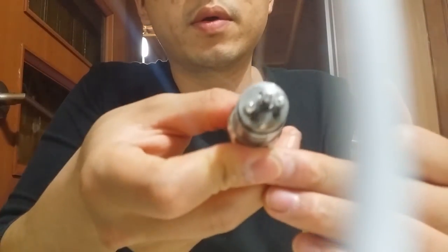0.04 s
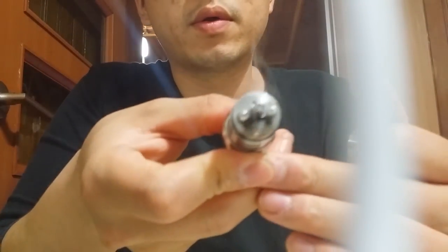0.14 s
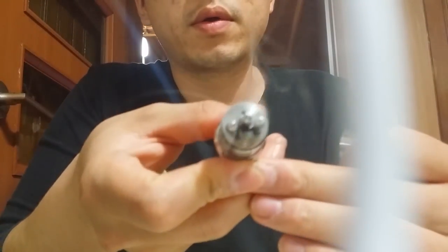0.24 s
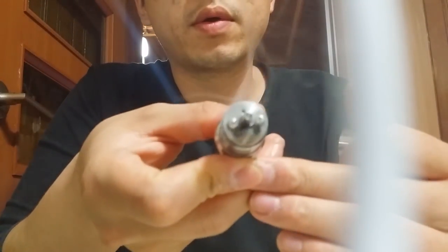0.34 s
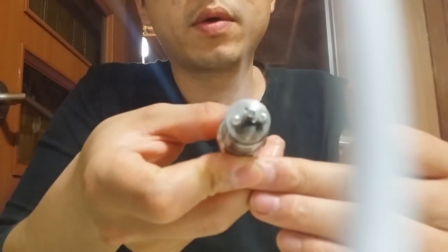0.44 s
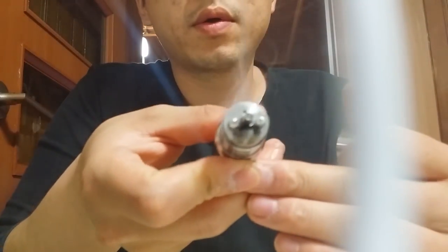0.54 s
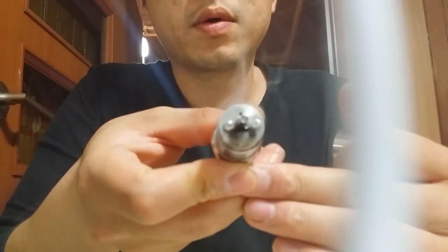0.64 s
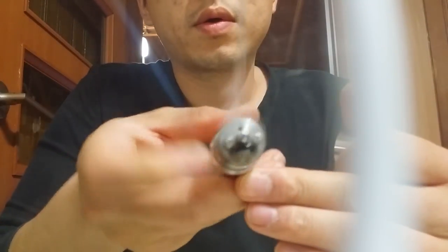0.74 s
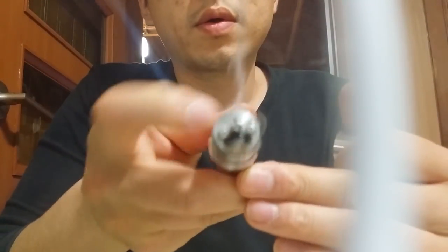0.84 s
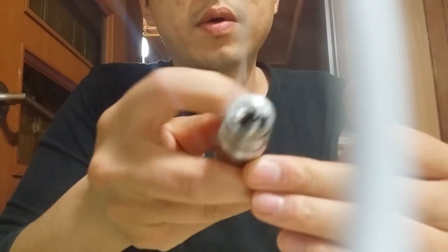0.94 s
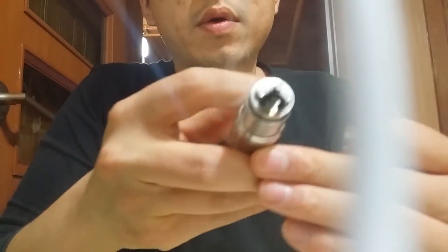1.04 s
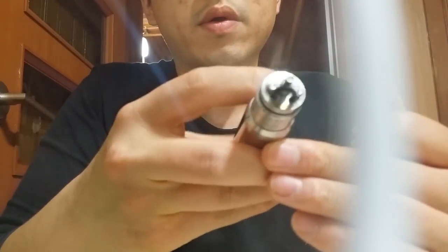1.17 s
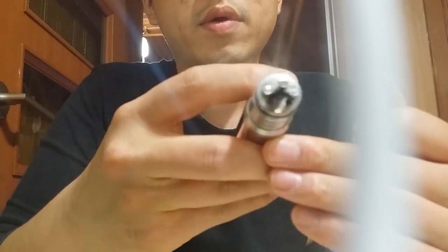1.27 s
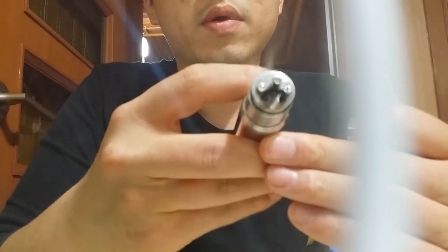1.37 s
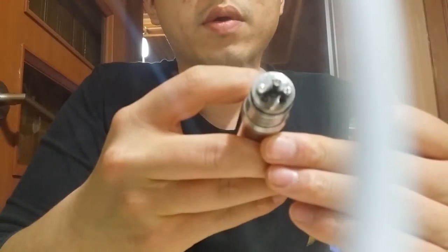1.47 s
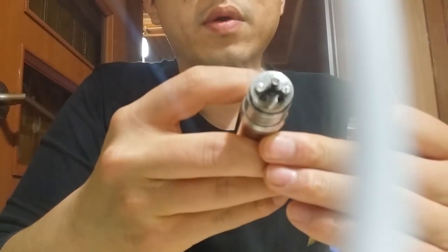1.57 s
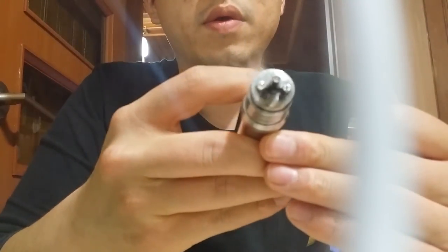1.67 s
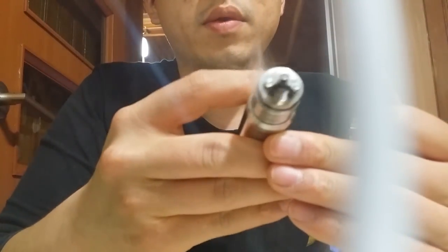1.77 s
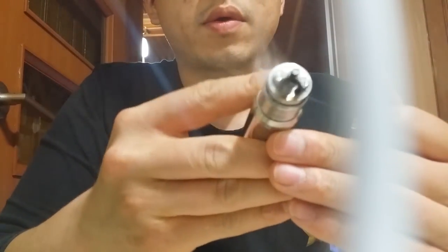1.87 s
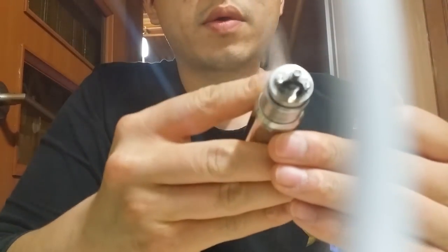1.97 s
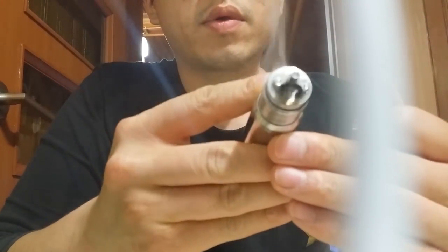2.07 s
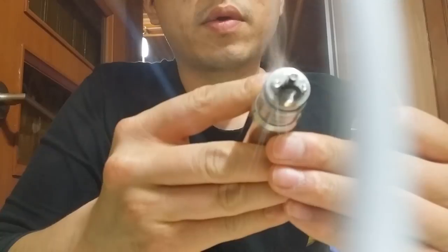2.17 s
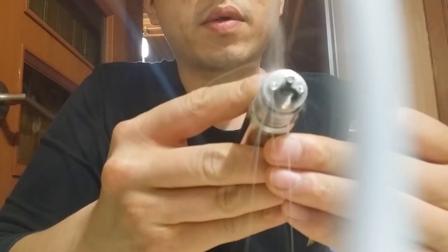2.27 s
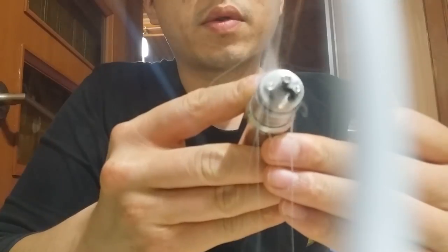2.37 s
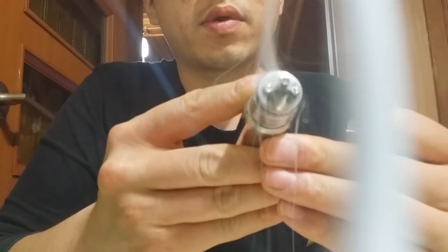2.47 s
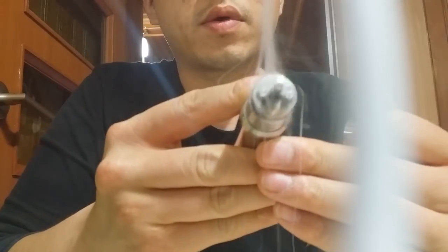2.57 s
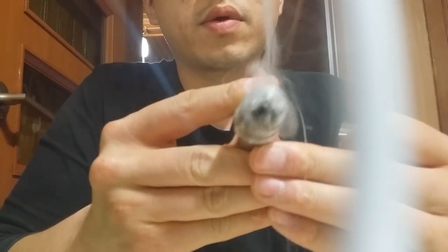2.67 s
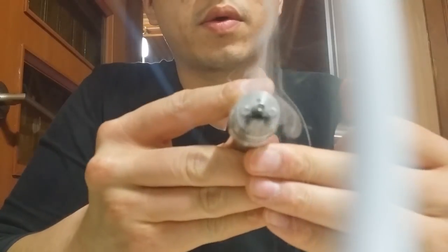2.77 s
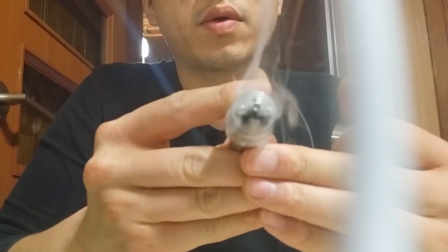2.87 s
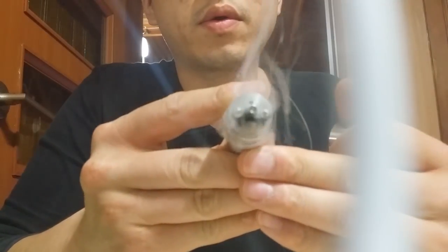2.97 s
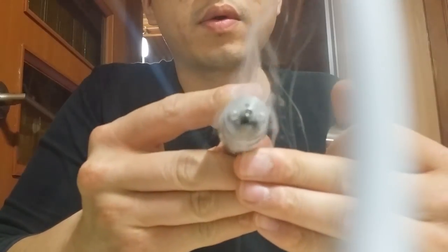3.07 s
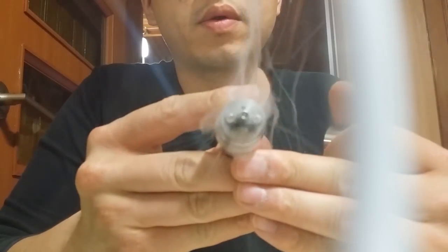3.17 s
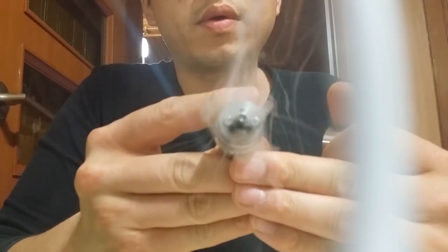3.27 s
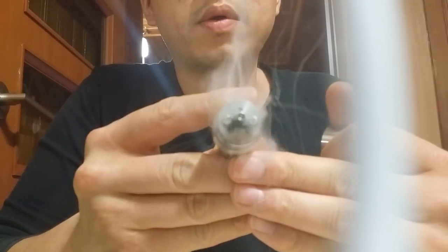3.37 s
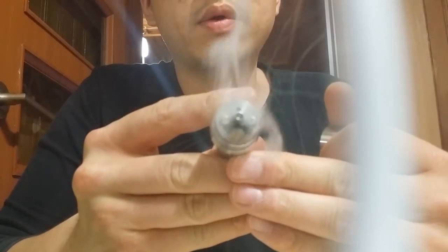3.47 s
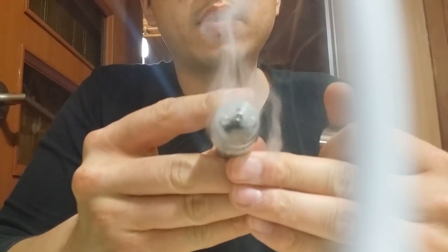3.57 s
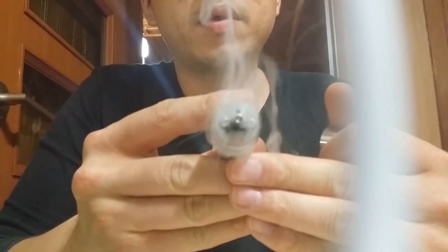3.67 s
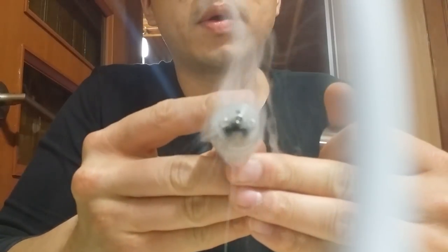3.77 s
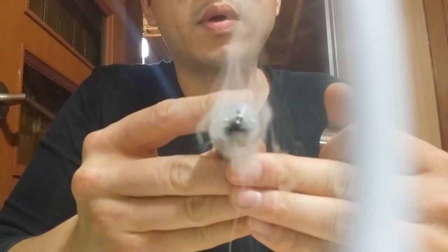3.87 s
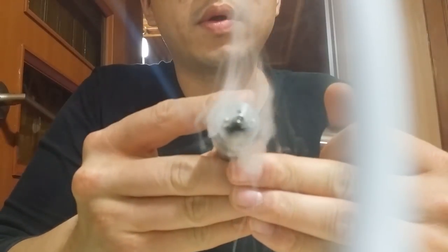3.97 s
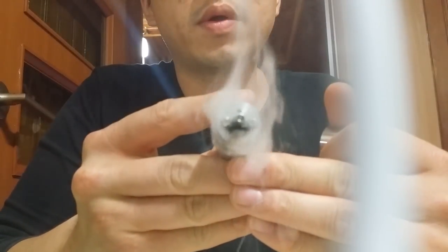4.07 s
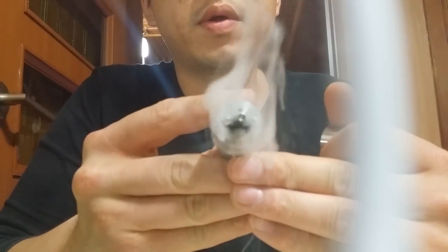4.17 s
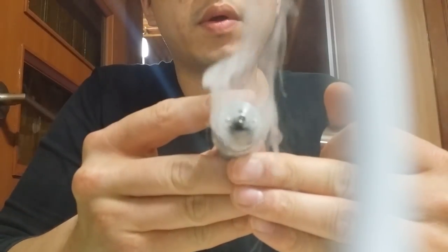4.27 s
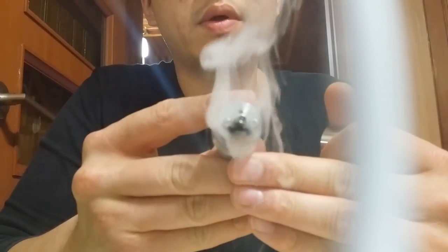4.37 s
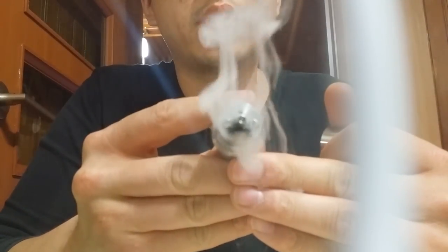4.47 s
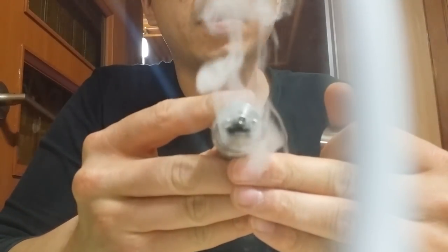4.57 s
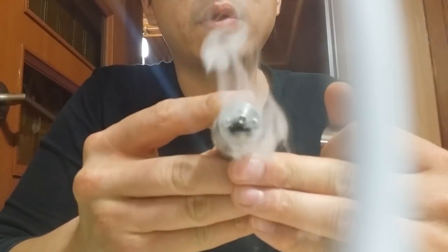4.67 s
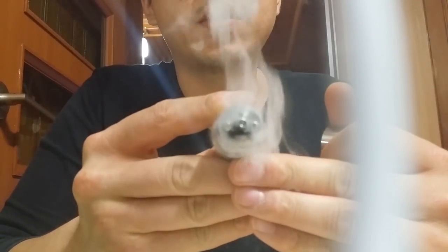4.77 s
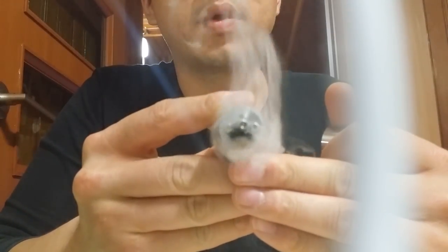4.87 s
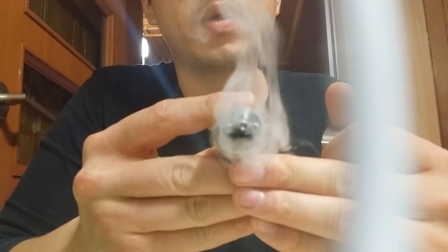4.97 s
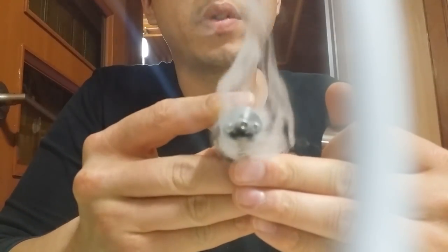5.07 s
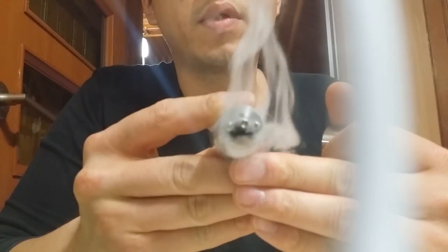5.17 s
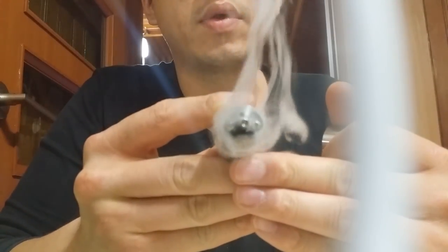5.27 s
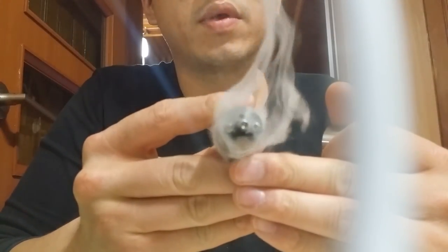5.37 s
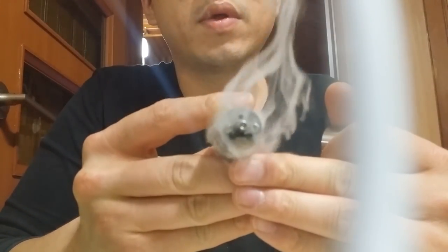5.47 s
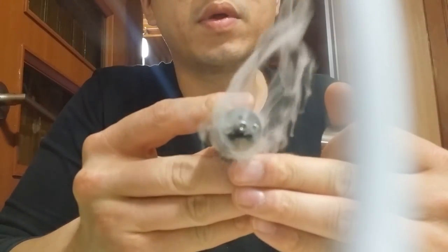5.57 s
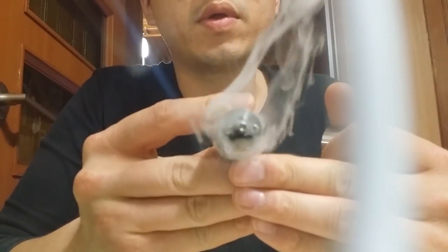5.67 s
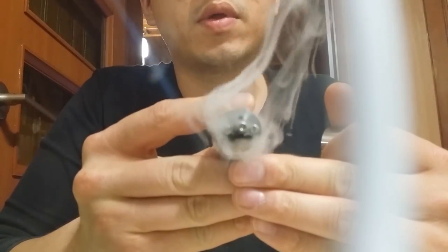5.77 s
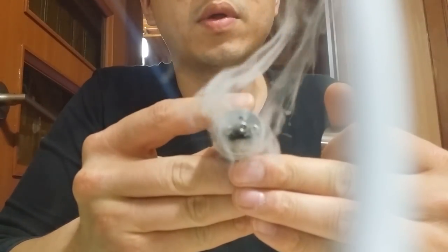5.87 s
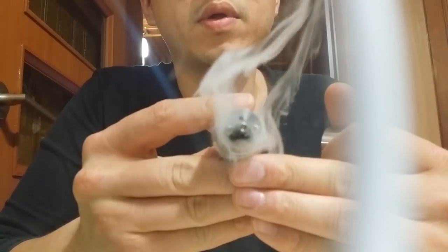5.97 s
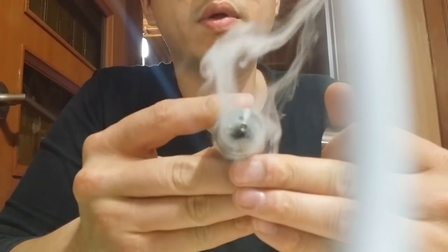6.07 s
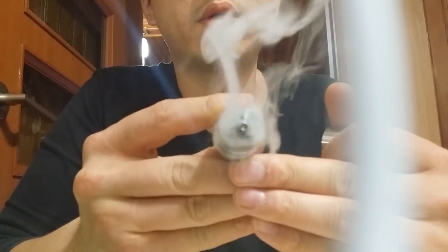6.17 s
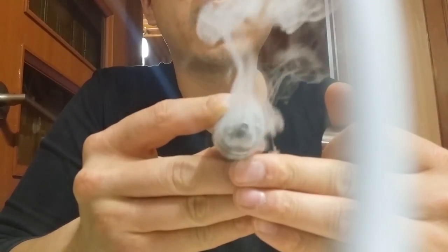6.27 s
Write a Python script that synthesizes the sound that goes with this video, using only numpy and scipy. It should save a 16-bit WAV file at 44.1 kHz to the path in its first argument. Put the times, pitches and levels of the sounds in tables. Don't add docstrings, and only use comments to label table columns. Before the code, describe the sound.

A small heating coil sizzles faintly, a switch clacks, then after a quiet gap it builds into loud, dense, crackling fizz that continues to the end.

```python
import sys
import numpy as np
from scipy import signal
from scipy.fft import irfft
from scipy.io import wavfile
from scipy.ndimage import uniform_filter1d

SR = 44100
rng = np.random.default_rng(int(sys.argv[2]) if len(sys.argv) > 2 else 0)


def to_wav(sig):
    pcm = np.clip(np.atleast_2d(sig), -1, 1) * 32767
    pcm = np.round(pcm).astype(np.int16)
    wavfile.write(sys.argv[1], SR, pcm.T)


def natural_amplitude(level_db):
    exponent = np.asarray(level_db, float) / 20
    return 10 ** exponent


N = 279594
T = np.arange(N) / SR

# time in seconds, fizz level in dB, share of coarse bubbles 0-1.
BOIL = [(0.0, -59.5, 0), (0.3, -53.5, 0.57), (0.51, -56.5, 0.7), (0.73, -55.5, 0.3), (0.83, -74, 0.1),
        (1.24, -76.5, 0), (1.62, -74, 0.04), (1.69, -61, 0.6), (2.2, -60, 0.34), (2.58, -53, 0),
        (2.91, -52.5, 0.1), (3.36, -49, 0.17), (3.78, -42, 0.45), (3.9, -47, 0.35), (4.15, -40.5, 0.4),
        (4.3, -41.5, 0.25), (5.21, -40.5, 0.29), (6.34, -41.5, 0.45)]


def evened(x):
    return x / np.sqrt(np.mean(x ** 2) + 1e-20)


def read(points, hz):
    f, value = np.transpose(points)
    return np.interp(np.log(hz + 1), np.log(f + 1), value)


def band(x, lo_hz, hi_hz):
    return signal.sosfilt(signal.butter(2, [lo_hz, hi_hz], "bandpass", fs=SR, output="sos"), x)


def boil_db():
    # time in seconds, lift in dB, fade time in seconds.
    flares = [(2.243, 4.5, 0.018), (2.95, 6, 0.088), (3.169, 5, 0.061), (3.32, 2.5, 0.022),
              (3.44, 3, 0.076)]
    s, db, _ = np.transpose(BOIL)
    lift_db = sum(peak_db * np.exp(-((T - at) / fade_s) ** 2) for at, peak_db, fade_s in flares)
    return np.interp(T, s, db) + lift_db


def bubbles(per_s, spread_db, most):
    size = natural_amplitude(spread_db * np.minimum(rng.exponential(1, N), most))
    train = evened(size * (rng.random(N) < per_s / SR))
    far = train * (rng.random(N) < .5)
    return np.array([train, train - far + np.roll(far, 1)])


def fizz():
    s, _, coarse = np.transpose(BOIL)
    coarse = np.interp(T, s, np.clip(coarse, 0, 1))
    fizz_db = boil_db()
    body_db = -11 - 0.0469 * (fizz_db + 52.5)
    flutter = natural_amplitude(0.56 * evened(uniform_filter1d(rng.standard_normal(N), 700)))
    fine_bursts = bubbles(6000, 2.54, 4.7) * flutter
    coarse_bursts = bubbles(240, 6.8, 1.85)
    drive = np.sqrt(1 - coarse) * fine_bursts + np.sqrt(coarse) * coarse_bursts
    body = natural_amplitude(body_db + 17.5) * band(drive, 167, 864)
    return natural_amplitude(fizz_db + 3.0) * (band(drive, 1570, 22000) + body)


def spit_rows():
    # time in seconds, peak in dB, middle band in dB re peak, low band in dB re peak.
    large = [(0.451, -16, -43, -28), (1.4532, -40.5, -10, -22), (2.1365, -23, -16, -28),
             (2.2452, -13, -8.5, -19), (2.2572, -19, -34, -44), (2.4818, -17.5, -12, -25),
             (2.5371, -27, -5.5, -21), (2.5455, -17.5, -20, -29), (2.8172, -16, -15, -28),
             (2.8256, -29, -2, -8), (3.0797, -26.5, -28, -6.5), (3.1745, -14, -7.5, -13),
             (3.2786, -18.5, -6.5, -15), (3.3253, -7, -13.5, -21.5), (3.5601, -16, -6.5, -14),
             (3.595, -16, -10, -14), (3.732, -14, -9.5, -17.5), (3.806, -10, -12, -15.5),
             (3.8263, -11.5, -10.5, -27), (3.8559, -2, -29, -38), (3.8692, -8, -23, -18.5),
             (3.8874, -5, -26, -31), (3.9442, -4, -16.5, -23.5), (3.9899, -2.5, -31, -30.5),
             (4.1665, -7.5, -12, -21), (4.4389, -6, -26, -26), (5.1187, -12, -16, -22),
             (5.2373, -13.5, -10.5, -16), (5.3017, -13, -30, -26), (6.2027, -15.5, -7, -14)]
    # time in seconds, peak in dB.
    ticks = [(0.1463, -24), (0.202, -23), (0.2276, -22.5), (0.2391, -25.5), (0.2545, -24), (0.268, -28),
             (0.2842, -21.5), (0.3122, -24.5), (0.3602, -26), (0.378, -22.5), (0.4124, -20.5),
             (0.4297, -22), (0.5536, -25), (0.5668, -19.5), (0.641, -23), (0.6583, -21.5), (0.69, -23),
             (0.718, -26), (0.729, -28),
             (3.1819, -16), (3.2307, -17), (3.4003, -9.5), (3.424, -14.5), (3.711, -9.5), (3.9045, -7.5),
              (3.959, -22), (3.977, -15), (4.0166, -8), (4.0478, -9), (4.1053, -8), (4.209, -13),
              (4.4691, -6), (4.6658, -11), (4.8467, -14), (5.2782, -8.5), (5.7352, -11.5), (5.855, -10),
              (5.9341, -9.5), (6.084, -10), (6.1338, -10), (6.3372, -5.5)]
    stray_count, stray_re_fizz_db, stray_spread_db = 70, 25, 3
    bright_mid_db, bright_low_db, colour_spread_db = -25.5, -28.5, 5.5
    at = rng.integers(0, N, stray_count)
    stray_db = boil_db()[at] + stray_re_fizz_db + stray_spread_db * rng.standard_normal(stray_count)
    plain = np.vstack([ticks, np.transpose([T[at], stray_db])])
    scatter = np.clip(rng.standard_normal(plain.shape), -1.5, 1.5)
    colour_db = [bright_mid_db, bright_low_db] + colour_spread_db * scatter
    return np.vstack([large, np.hstack([plain, colour_db])])


def spits():
    after_s, after_share, lag_s = .0016, 0.56, .0003
    rows = spit_rows()
    trains = np.zeros((3, N + 200))
    all_waits = rng.uniform(.15, 1, (len(rows), 3))
    for (s, db, mid_db, low_db), waits in zip(rows, all_waits):
        size = natural_amplitude(db + np.array([-1.5, mid_db + 15, low_db + 29]))
        at = round((s + lag_s) * SR)
        trains[:, at] += size
        for wait in waits:
            trains[:, at + round(wait * after_s * SR)] += after_share * (1.2 - wait) * size * [1, .4, .3]
    top, mid, low = trains[:, :N]
    return band(top, 3140, 16500) + band(mid, 2000, 3180) + band(low, 178, 880)


def paths(dip_shift, dip_depth, trail_shift, shade_db):
    # frequency in Hz, gain in dB.
    left_path = [(100, -27.5), (550, -22), (950, -13.5), (1450, -11.5), (2300, -10), (4050, -10.5),
                 (4600, -9), (5000, -1.5), (6500, -1), (7300, -2.5), (8000, 2), (9200, -8.5), (10400, -9.5),
                 (14000, -14)]
    right_path = [(100, -34), (550, -27), (950, -13), (1450, -12.5), (2300, -13), (4050, -7), (4500, -2),
                  (5200, -11), (6900, 2.5), (7600, -15), (8500, -22), (10000, -13.5), (12000, -26),
                  (14000, -12.5)]
    # centre in Hz, width in Hz, left gain in dB, right gain in dB.
    dips = [(780, 50, -12, -6), (1230, 90, -26, -26), (1650, 90, -18, -18), (3320, 60, -16, -12),
            (5600, 150, -6, -6), (7680, 150, -9, -5), (9800, 150, -11, -1), (10330, 90, -1, -13),
            (10980, 130, -15, -14), (12780, 130, -14, -14)]
    # frequency in Hz, phase in radians.
    trail = [(600, 0), (1000, .9), (1350, 1.7), (2000, .2), (2700, 1.4), (3300, 2.3), (4100, 2.9),
             (4700, 3.7), (5600, 3.1), (6700, 3.7), (7400, 5.3), (9000, 4.8), (11000, 6.6), (14000, 7.8)]
    shade_hz, shade_width_hz, path_gain = 6260, 1600, 4.625
    hz = np.fft.rfftfreq(4096, 1 / SR)
    db = np.array([read(left_path, hz), read(right_path, hz)])
    shade = np.exp(-((hz - shade_hz) / shade_width_hz) ** 2)
    db = db - np.outer([max(shade_db, 0), max(-shade_db, 0)], shade)
    for f, width_hz, *port_db in dips:
        db = db + dip_depth * np.outer(port_db, np.exp(-((hz - f * dip_shift) / width_hz) ** 2))
    log_gain = np.log(natural_amplitude(np.concatenate([db[0], db[0, -2:0:-1]])))
    phase = -signal.hilbert(log_gain).imag[:len(hz)]
    phase = phase - np.outer([0, 1], read(trail, hz / trail_shift))
    response = irfft(natural_amplitude(db) * np.exp(1j * phase))[:, :2048]
    return response * path_gain


def coil():
    # time in seconds, factor on dip frequencies, share of dip depth 0-1,
    # factor on trail frequencies, shading of the presence band in dB (above 0 left port, below 0 right).
    poses = [(.76, .98, .6, .82, 4), (1.0, .97, .5, 1.2, -6), (1.55, .97, .5, 1.4, -6),
             (1.75, .968, .6, 1.6, 2), (2.6, .98, .75, 1.4, 1), (3.2, 1.0, .9, 1.0, 0)]
    drive = fizz() + spits()
    times_s = [pose[0] for pose in poses]
    shares = [np.interp(T, times_s, here) for here in np.eye(len(poses))]
    out = np.zeros((2, N))
    for share, pose in zip(shares, poses):
        out += signal.oaconvolve(share * drive, paths(*pose[1:]), axes=1)[:, :N]
    return out


def switch():
    # frequency in Hz, level in dB, t60 in seconds.
    modes = [(3200, -14, .003), (5000, -9, .003), (6500, 6, .0055), (8500, 1, .003), (9900, -9, .003),
             (13200, -10, .003)]
    start_s, level_db = .7422, -4
    close_s, rebound_s, rebound_gain = .0006, 0.0025, 0.45
    t = np.arange(1000) / SR
    ring = sum(natural_amplitude(db - 60 * t / t60_s) * np.sin(2 * np.pi * hz * t) for hz, db, t60_s in modes)
    hits = (rng.random((2, len(t))) < .3) * rng.choice([-1, 1], len(t))
    rattle = (t / close_s) * np.exp(-t / close_s) * hits
    clack = band(signal.fftconvolve(rattle, ring[None], axes=1), 2800, 17000)
    clack = clack / np.linalg.norm(clack, axis=1, keepdims=True)
    clack = clack + rebound_gain * np.roll(clack, round(rebound_s * SR), axis=1)
    out, at = np.zeros((2, N)), round(start_s * SR)
    out[:, at:at + clack.shape[1]] = natural_amplitude(level_db) * clack
    return out


def bumps():
    # time in seconds, peak in dB, thud frequency in Hz.
    pushes = [(0.742, -39.5, 99), (1.189, -57.5, 78.5), (1.47, -78, 190), (2.04, -65, 180)]
    out, t = np.zeros(N), np.arange(2000) / SR
    for s, db, hz in pushes:
        puff = evened(band(band(rng.standard_normal(len(t)), 210, 660), 210, 660))
        thud = np.sin(2 * np.pi * hz * t)
        out[round(s * SR):][:len(t)] += natural_amplitude(db - 60 * t / 0.088) * (0.64 * thud + 0.65 * puff)
    return out


def room(x):
    # frequency in Hz, t60 in seconds.
    decay = [(200, 0.5), (1000, 0.39), (6000, 0.14), (14000, 0.33)]
    sway_hz = 1.7
    taps = np.zeros((2, 2, SR // 3))
    at = np.arange(80, SR // 3 - 20, 20)
    at = at + rng.integers(0, 20, (2, 2, len(at)))
    np.put_along_axis(taps, at, rng.choice([-1., 1.], at.shape), 2)
    hz, t, z = signal.stft(taps, SR, nperseg=128)
    fade = natural_amplitude(-60 * t / read(decay, hz)[:, None])
    tails = signal.istft(z * fade, SR, nperseg=128)[1]
    sway = [np.sin(2 * np.pi * sway_hz * T), np.cos(2 * np.pi * sway_hz * T)]
    out = np.zeros((2, N))
    for weight, tail in zip(sway, tails):
        out += signal.oaconvolve(weight * x, tail / np.linalg.norm(tail[0]), axes=1)[:, :N]
    return out


def opening_db():
    open_db, knee_db, shut_per_db, lag_s = -55, -54.5, 0.6, 0.066
    shut_db = shut_per_db * np.minimum(boil_db() - knee_db, 0)
    r = np.exp(-1 / (lag_s * SR))
    return open_db + signal.lfilter([1 - r], [1, -r], shut_db, zi=[-9.])[0]


def rumble():
    # time in seconds, peak in dB.
    nudges = [(0.25, -65), (0.76, -65.5), (1.48, -70.5), (2.05, -65), (2.75, -68), (3.17, -61.5),
              (3.58, -61), (4.18, -65), (4.41, -76), (4.66, -63.5), (5.26, -74), (5.7, -65)]
    fall_db_per_s, rest_re_hum_db = 82, -23.5
    shared, left, right = band(band(rng.standard_normal((3, N)), 53, 146), 39, 145)
    level = natural_amplitude(opening_db() + rest_re_hum_db)
    level = level + sum(natural_amplitude(db - fall_db_per_s * abs(T - s)) for s, db in nudges)
    return level * evened(shared + 1.05 * np.array([left, right]))


def room_air():
    # frequency in Hz, density in dB per Hz.
    spectrum = [(60, -39), (100, -13), (175, -8.5), (260, -12.5), (450, -18), (600, -12), (900, -36),
                (1500, -22), (3000, -23.5), (4700, -23), (6300, -13), (7900, -32), (9500, -29),
                (14000, -46)]
    # frequency in Hz, left minus right in dB.
    lean = [(60, -9), (180, 0.5), (540, -2), (1640, 1), (4940, 6.5), (14900, -4)]
    # frequency in Hz, likeness 0-1.
    likeness = [(100, 0.56), (600, 0.69), (900, 0.41), (14000, 0.19)]
    hz = np.fft.rfftfreq(1024, 1 / SR)
    a, b, c, d = rng.standard_normal((N // 256 + 5, 513, 4)).T
    same = np.clip(read(likeness, hz), 0, 1)[:, None]
    left = a + 1j * b
    z = np.array([left, same * left + np.sqrt(1 - same ** 2) * (c + 1j * d)])
    z = z * natural_amplitude(read(spectrum, hz) + np.outer([.5, -.5], read(lean, hz)))[:, :, None]
    return natural_amplitude(-72.5) * evened(signal.istft(z, nperseg=1024, noverlap=768)[1][:, :N])


def motor_hum():
    # multiple of the base frequency, level in dB.
    lines = [(2, -19), (3, 0), (4, -12), (6, -13), (9, -21), (10, -14)]
    base_hz = 58.52
    waver = 1 + 0.0011 * evened(uniform_filter1d(rng.standard_normal(N), 6000))
    turns = np.cumsum(base_hz * waver) / SR
    return sum(natural_amplitude(db) * np.sin(2 * np.pi * (k * turns + rng.random())) for k, db in lines)


def background():
    open_db = opening_db()
    return natural_amplitude(open_db + 70.5) * room_air() + natural_amplitude(open_db - 6) * motor_hum() * natural_amplitude([[1.2], [-1.2]])


def masked(x, column):
    # frequency in Hz, depth in dB within one port, depth in dB in mid or side.
    limits = [(900, 40, 40), (1100, 9, 10), (2000, 8, 10), (2800, 11, 7.5), (3500, 11, 4), (4400, 12, 5),
              (5200, 14, 15), (9500, 11, 16), (11000, 8, 15), (14000, 7, 15)]
    hz, _, z = signal.stft(x, SR, nperseg=2048, noverlap=1024)
    bins = np.arange(len(hz))
    power = uniform_filter1d(abs(z) ** 2, size=2, axis=2) + 1e-20
    neighbours = power if column == 1 else power.mean(0, keepdims=True)
    cover = uniform_filter1d(neighbours, size=48, axis=1)
    under_db = read(np.array(limits)[:, [0, column]], hz)[:, None]
    in_band = uniform_filter1d(power, size=8, axis=1)[:, bins // 8 * 8 + 4 * (hz < 20000)]
    scatter_db = 1.5 * rng.standard_normal((len(hz), z.shape[2]))[bins // 16]
    keep = 10 * np.log10(in_band / cover) + under_db + scatter_db > 0
    return signal.istft(z * keep, SR, nperseg=2048, noverlap=1024)[1][:, :N]


def scene():
    sizzle, clack = coil(), switch()
    reverb = natural_amplitude(-4.5) * room(sizzle + natural_amplitude(-4) * clack)
    hiss = natural_amplitude(-79) * band(rng.standard_normal((2, N)), 830, 20000)
    return sizzle + clack + reverb + bumps() + rumble() + background() + hiss


def top_cut(x):
    return signal.sosfilt(signal.butter(12, 15490, fs=SR, output="sos"), x)


def record(dry):
    edge = signal.firwin(255, 14480, window=("kaiser", 7), fs=SR)
    low = signal.oaconvolve(dry, edge[None], "same")
    top = dry - low
    sharp = uniform_filter1d(top ** 2, size=128) > 3.5 * uniform_filter1d(top ** 2, size=4096)
    sharp_top = natural_amplitude(-13) * top * uniform_filter1d(1. * sharp, size=128)
    turn = np.array([[1, 1], [1, -1.014]]) / np.sqrt(2)
    thinned = turn @ masked(turn @ masked(low, column=1), column=2)
    return top_cut(thinned + sharp_top)


dry = scene()
out = record(dry)
to_wav(out)
```